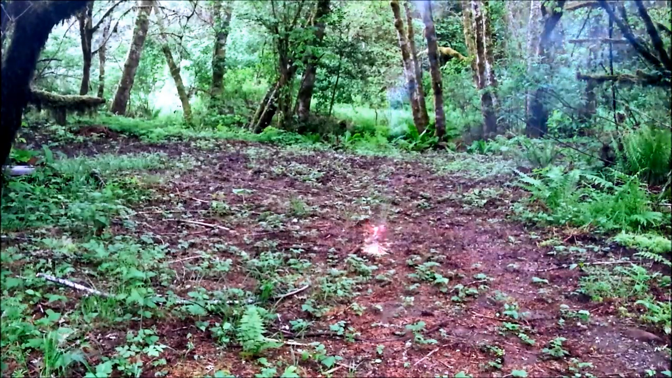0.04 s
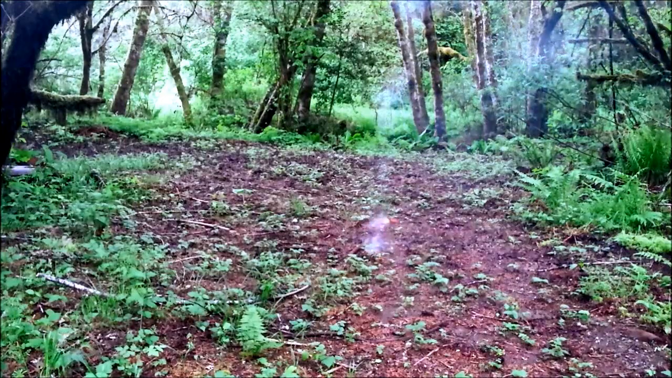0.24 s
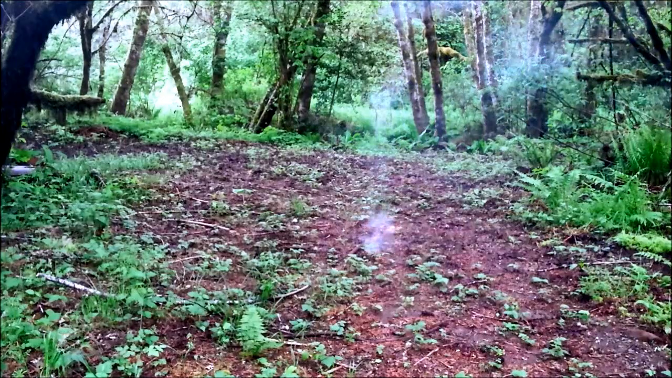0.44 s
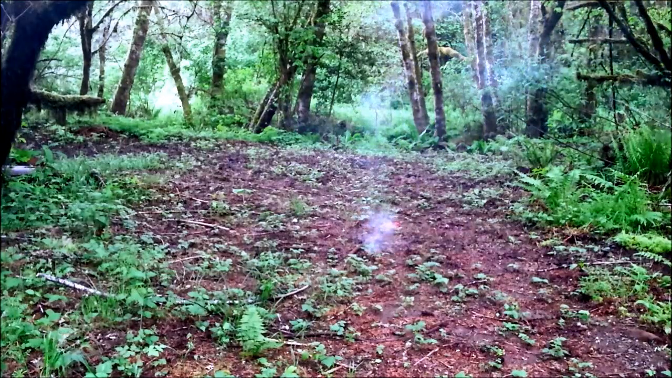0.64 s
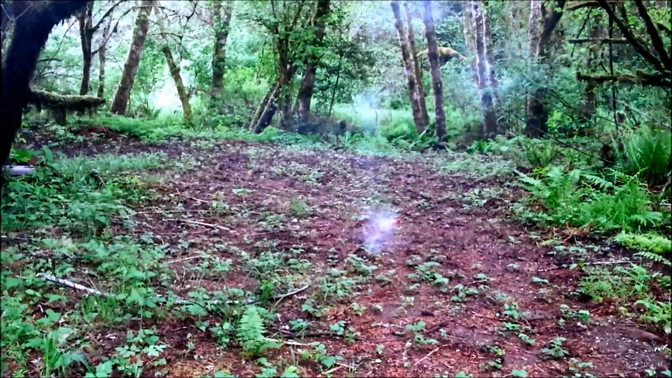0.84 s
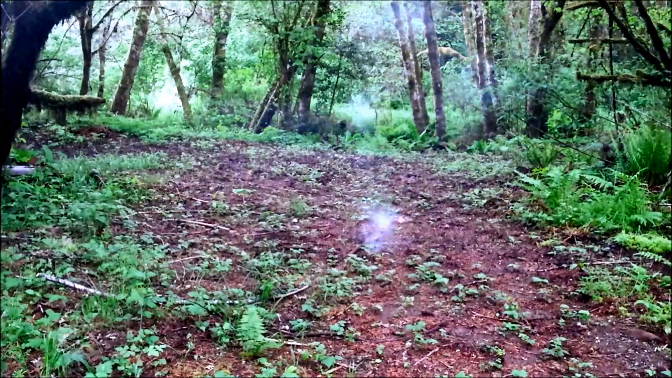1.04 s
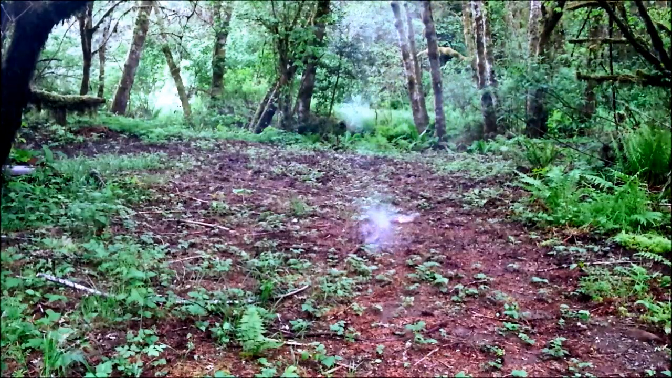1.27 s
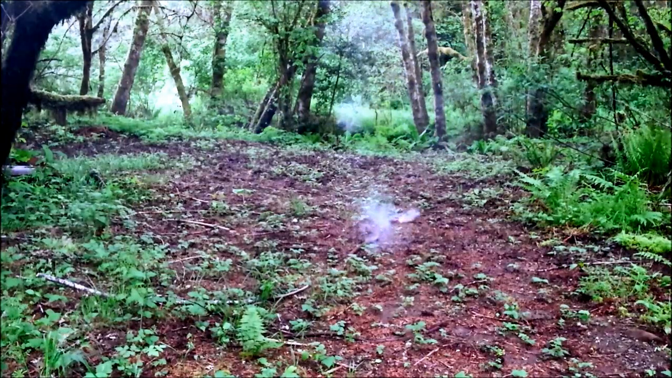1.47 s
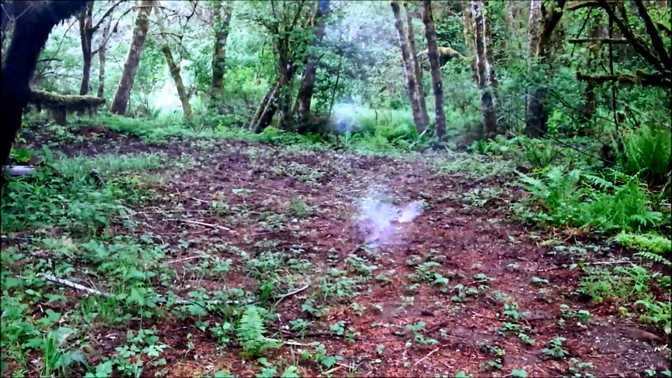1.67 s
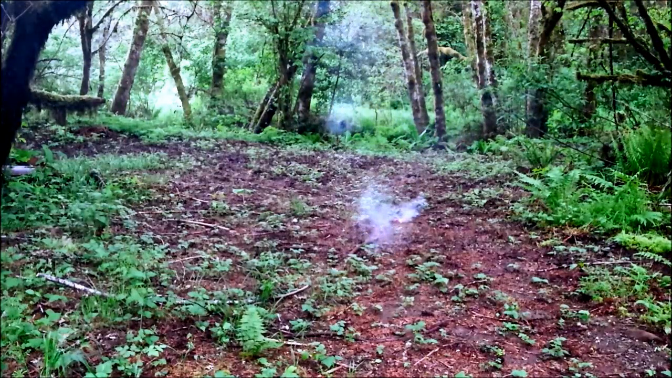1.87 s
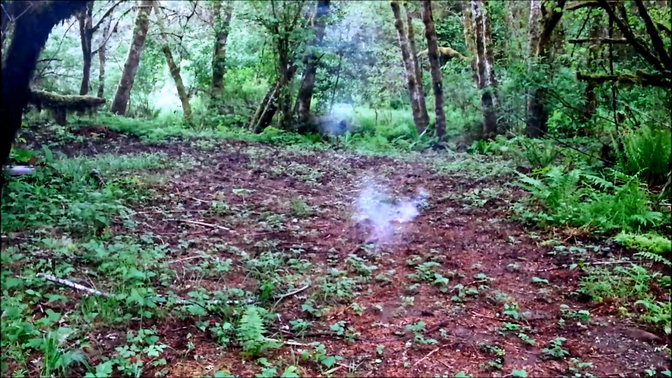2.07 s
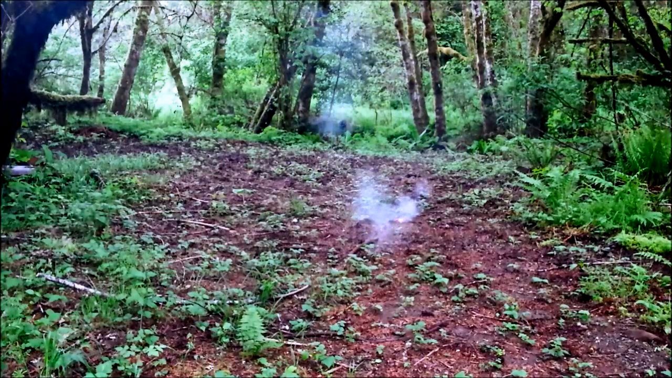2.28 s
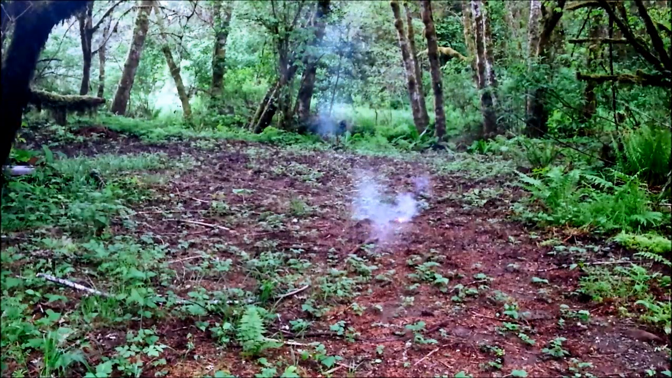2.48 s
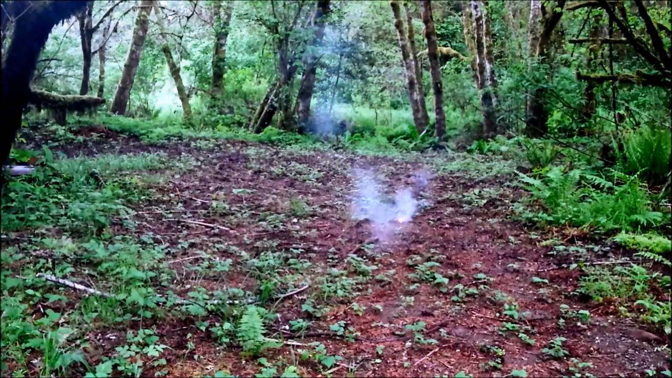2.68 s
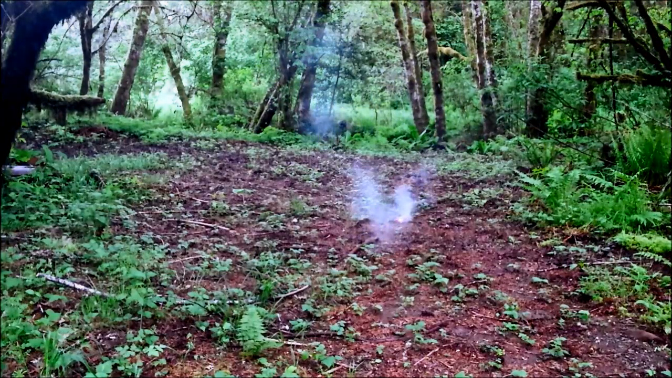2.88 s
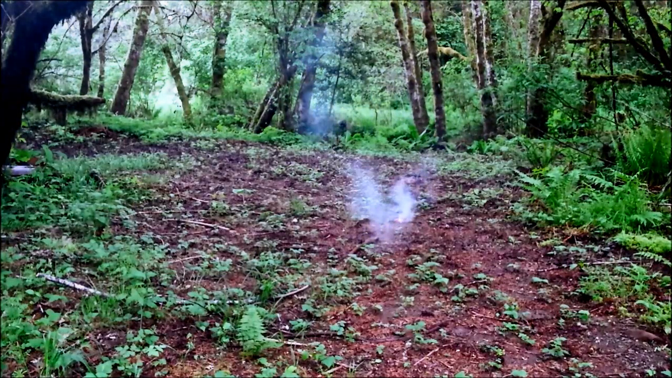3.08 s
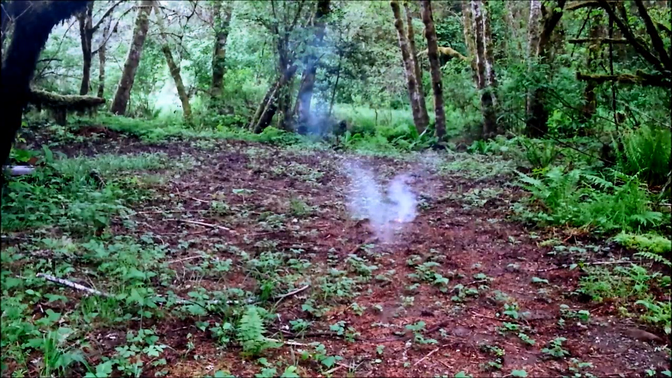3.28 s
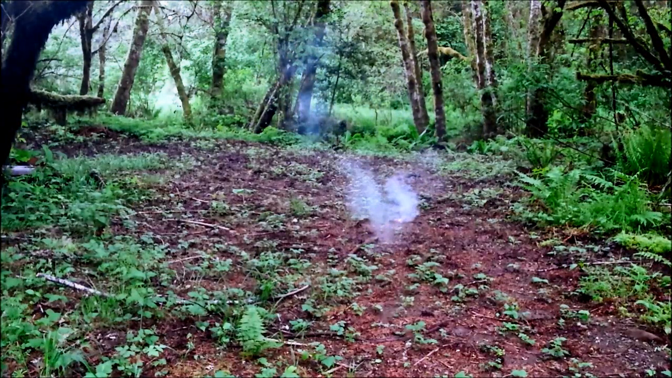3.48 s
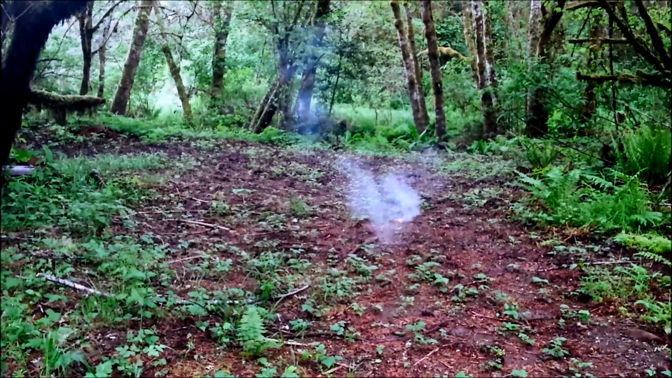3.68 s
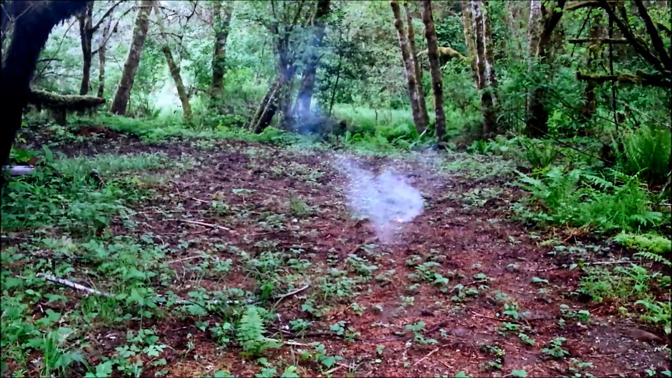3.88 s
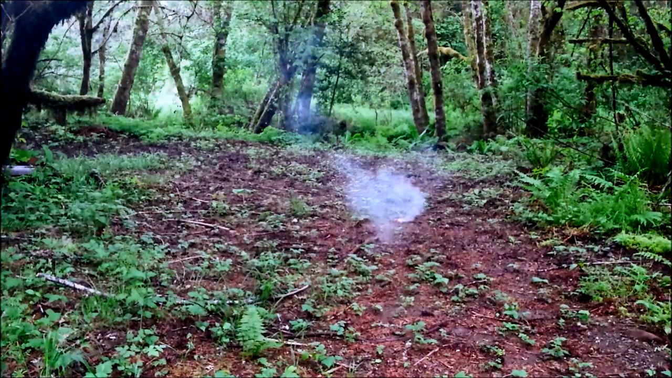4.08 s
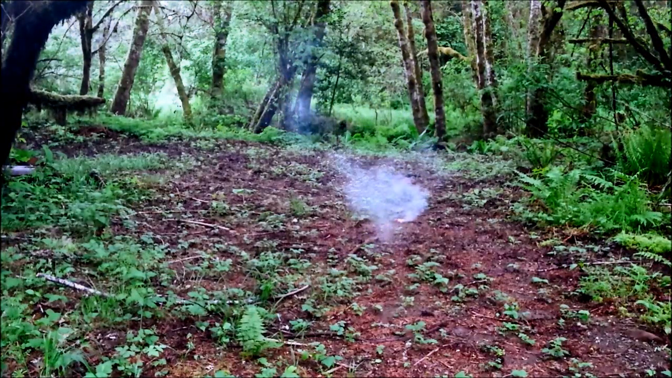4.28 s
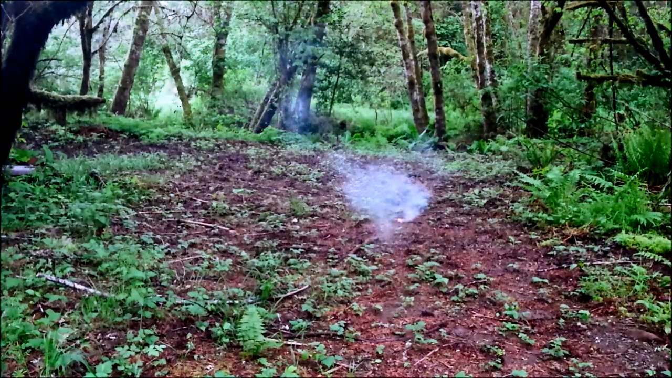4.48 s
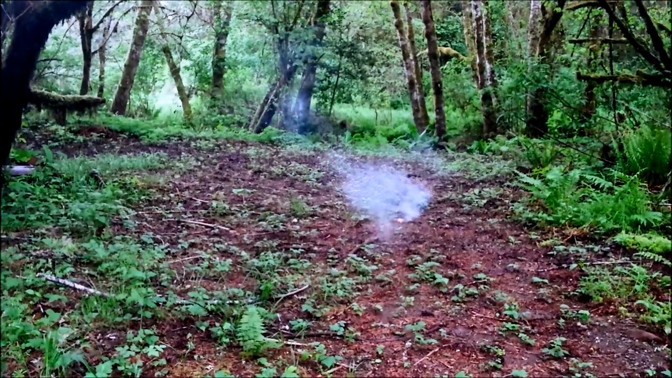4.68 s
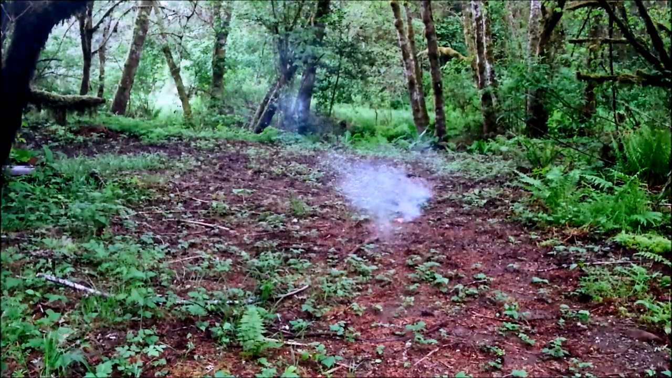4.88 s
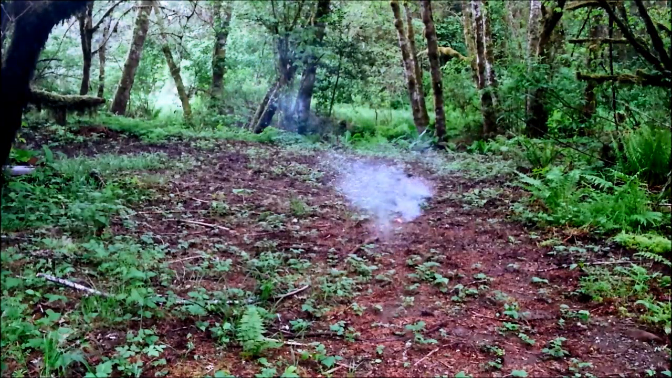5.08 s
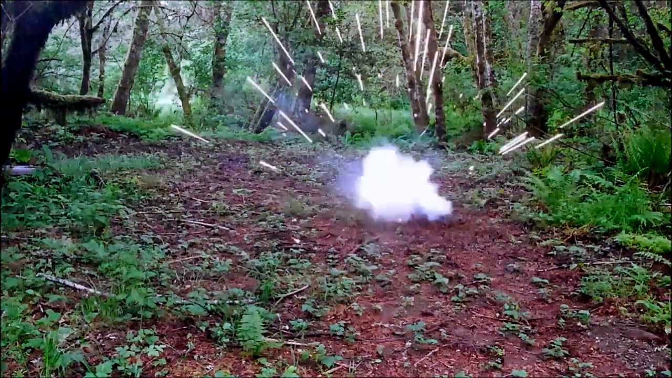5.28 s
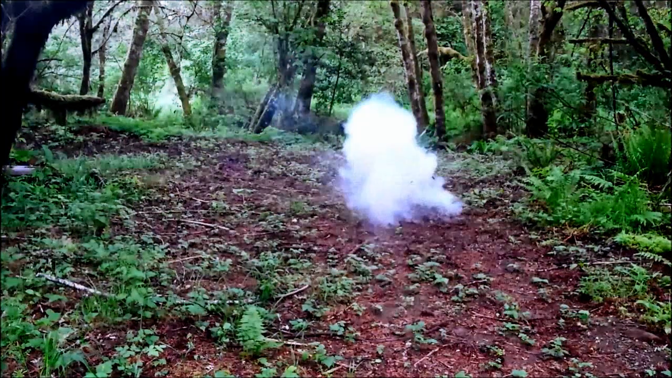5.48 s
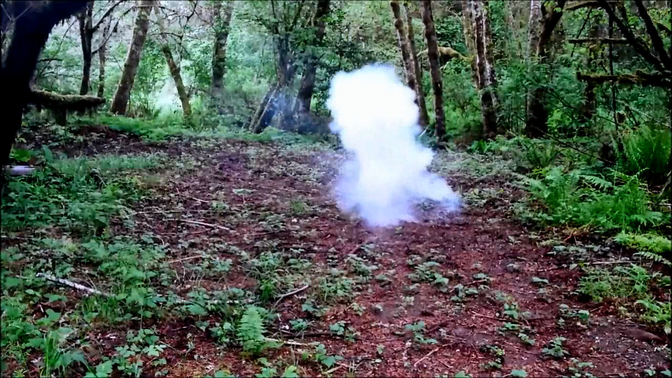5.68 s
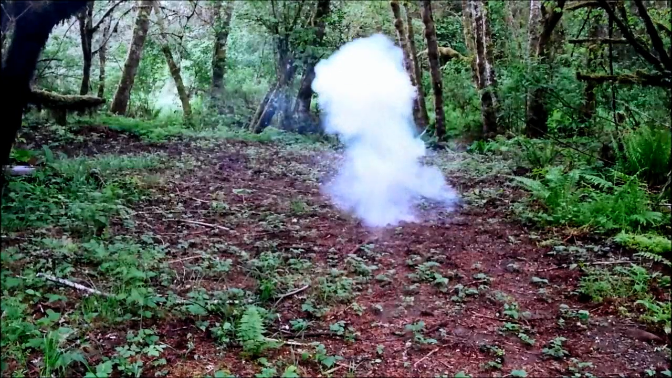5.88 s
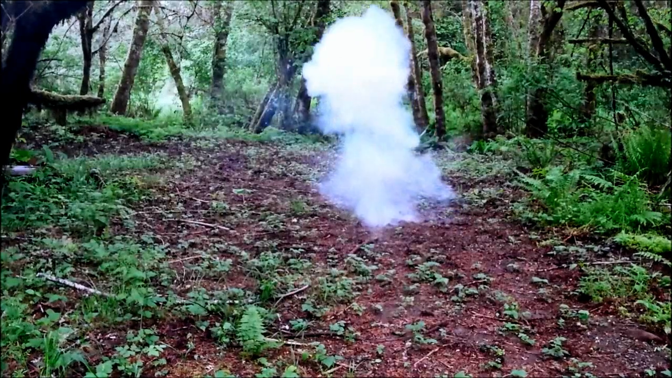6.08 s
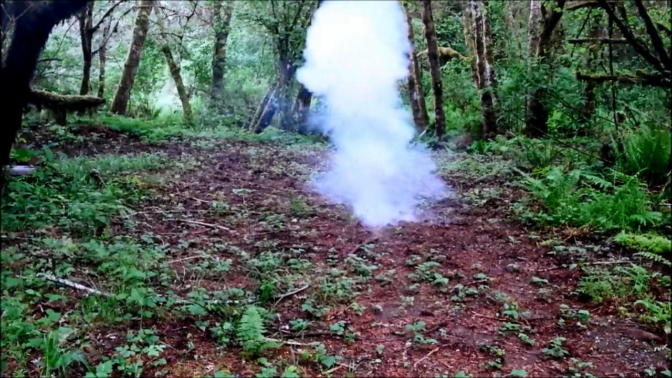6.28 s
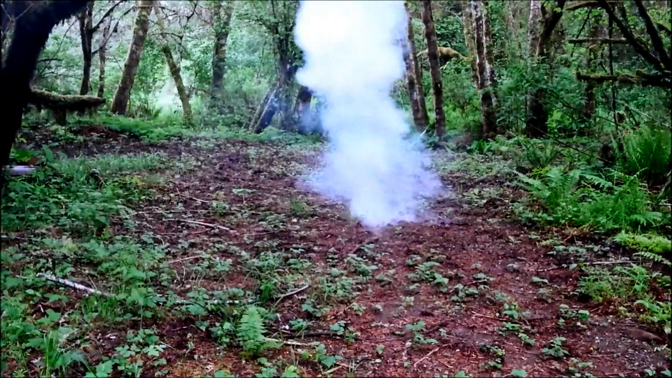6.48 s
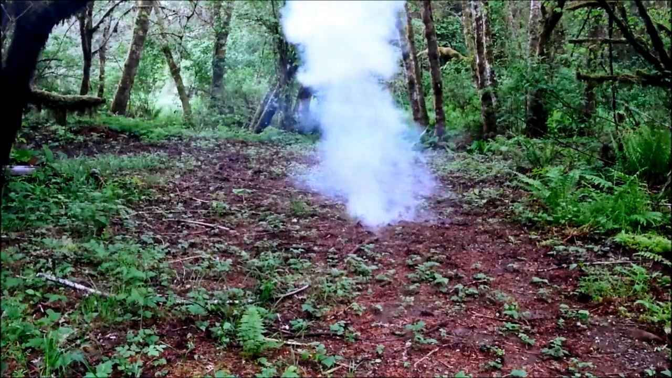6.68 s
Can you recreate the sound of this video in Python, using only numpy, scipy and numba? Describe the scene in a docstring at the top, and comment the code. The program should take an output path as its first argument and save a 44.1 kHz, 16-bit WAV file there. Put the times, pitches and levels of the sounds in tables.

```python
"""Firecracker in a wet wood

A firecracker (N-shaped pressure wave) lies on damp woodland ground; two microphones a hand apart
listen from some metres off. Wet leaves hiss (shaped noise) and drip (ringing clicks); something shifts
in the litter to the left (noise swells, hollow knocks). The blast overloads the recorder, whose gain
drops and creeps back while trees and far slopes send the bang home (fading, patchy noise)."""
import sys
import numpy as np
from scipy import signal
from scipy.fft import rfft, irfft, next_fast_len
from scipy.io import wavfile
from scipy.ndimage import uniform_filter1d
from numba import njit

SR = 44100
rng = np.random.default_rng(int(sys.argv[2]) if len(sys.argv) > 2 else 0)


def inscribe(sig):
    """Save sig as 16-bit PCM at rate SR to the path in sys.argv[1].

    A 1-D sig is mono; a 2-D sig holds one channel per row.
    Samples are clipped to [-1, 1] before scaling.
    """
    pcm = np.round(np.clip(np.atleast_2d(sig).T, -1, 1) * 32767)
    wavfile.write(sys.argv[1], SR, pcm.astype(np.int16))


def convert_level_to_amplitude(level_db):
    """Map a level in decibels to its linear amplitude factor."""
    exponent = np.asarray(level_db, float) / 20
    return 10 ** exponent


N = 297234
BLAST_S = 5.2271


def on_log(hz, table, col=1):
    """Read a column of a table on a log-frequency axis."""
    table = np.array(table)
    return np.interp(np.log(np.maximum(hz, 1)), np.log(table[:, 0]), table[:, col])


def band(x, hz, ratio):
    """Band-pass round hz, width as a ratio either side."""
    edges_hz = [hz / ratio, min(hz * ratio, 0.45 * SR)]
    return signal.sosfilt(signal.butter(2, edges_hz, "band", fs=SR, output="sos"), x)


def low(x, hz):
    """Low-pass, scaled to rms 1."""
    y = signal.sosfilt(signal.butter(2, hz, fs=SR, output="sos"), x)
    return y / y.std()


def aim(x, side):
    """A plane wave from one side (-1 left to 1 right) reaches the nearer port first."""
    port_gap_s = 18 / 44100
    pad = next_fast_len(len(x))
    hz = np.fft.rfftfreq(pad, 1 / SR)
    turn = np.exp(-1j * np.pi * hz * side * port_gap_s * np.array([[1], [-1]]))
    return irfft(rfft(x, pad) * turn, pad)[:, :len(x)]


def walk(rate_hz, size):
    """Random levels held 1 / rate_hz and slewed twice; spread near 1."""
    hold = int(SR / rate_hz)
    steps = np.repeat(rng.standard_normal(size // hold + 1), hold)
    slewed = uniform_filter1d(uniform_filter1d(steps, hold), hold)
    return 1.77 * slewed[:size]


def add(out, at_s, x, peak_db):
    """Mix a short sound in at a time and peak level."""
    i = int(at_s * SR)
    scaled = x * convert_level_to_amplitude(peak_db) / np.abs(x).max()
    out[i:i + len(x)] += scaled[:len(out) - i]


def faint(level_db, scatter_db, typical):
    """Chance rows (t/s, level/dB, length or pitch) scattered over the time before the blast."""
    per_s = 1.2
    count = int(per_s * BLAST_S)
    at_s, chance = rng.random(count) * BLAST_S, rng.standard_normal((count, 2))
    levels_db = level_db + scatter_db * chance[:, 0]
    return list(zip(at_s, levels_db, typical * np.exp(0.28 * chance[:, 1])))


# tree scatter: f/Hz, relative density at the start/dB, t60 before stretch/s
WOODS = [(30, -13, 1.3), (73, -1, 2.02), (171, 9, 1.5), (400, 6.5, 2.96), (900, 5.5, 2.5), (2240, 7, 1.91),
         (3950, 8, 1.555), (7000, 10, 1.06), (9500, 8.5, 0.86), (12000, 9.5, 0.28), (15900, 12.5, 0.26)]


def scatter(late_s, tilt_db_per_oct, stretch):
    """Noise from many trunks, fading band by band; air and leaves eat the treble first."""
    pad = len(late_s)
    hz = np.fft.rfftfreq(pad, 1 / SR)
    noise = rfft(rng.standard_normal(pad))
    centres_hz = 30 * 2 ** np.r_[0:8:.5, 8:9.3:.25]  # half octaves, finer on top
    field = 0
    for centre, row in zip(centres_hz, np.eye(len(centres_hz))):
        mask = np.sin(np.pi / 2 * on_log(hz, np.c_[centres_hz, row])) ** 2
        start_db = on_log(centre, WOODS) + tilt_db_per_oct * np.log2(centre / 1000)
        t60_s = stretch * on_log(centre, WOODS, col=2)
        patchy_db = (2.6 if centre < 1200 else 1.1) * walk(20, pad)  # trunks stand in clumps
        field = field + irfft(noise * mask, pad) * convert_level_to_amplitude(start_db - 60 * late_s / t60_s + patchy_db)
    return field


# returns: side (-1 left to 1 right), delay/s, rise/s, relative level/dB
RETURNS = [(0, 0, .0002, -2), (0, .012, .05, 1), (-.98, .006, .09, 3), (.98, .008, .09, 2.5),
           (-.45, .04, .06, 1.5), (.6, .07, .012, 8), (.55, .22, .03, -2), (.98, .35, .2, -11),
           (.4, .45, .2, -13), (.8, 1.15, .3, -27), (-.3, 1.2, .3, -29)]


def returns(t, end_s):
    """Later returns are duller; deep stands swell slowly and linger."""
    near_db_per_oct, far_db_per_oct, turn_s = 1.95, -4, 0.13
    out = np.zeros((2, len(t)))
    for side, delay_s, rise_s, db in RETURNS:
        late_s = np.maximum(t - delay_s, 0)
        tilt = far_db_per_oct + (near_db_per_oct - far_db_per_oct) * np.exp(-delay_s / turn_s)
        stretch = 0.33 + 0.75 * delay_s + 2.29 * np.sqrt(rise_s)
        swell = (1 - np.exp(-late_s / rise_s)) * (t < end_s)
        out += aim(scatter(late_s, tilt, stretch) * swell * convert_level_to_amplitude(db), side)
    return out


def shudder(t):
    """Housing shakes under the blast: decaying low noise, unlike at each port."""
    start_db, top_hz, t60_s = -3.5, 92, 1.1
    return low(rng.standard_normal((2, len(t))), top_hz) * convert_level_to_amplitude(start_db - 60 * t / t60_s)


def bang():
    """N-shaped pressure wave: a jump, a linear fall through zero, a jump back; then returns, shudder."""
    peak_db, half_s = 10, 0.001
    start = int(BLAST_S * SR)
    size = N - start
    t = np.arange(next_fast_len(size + SR // 10)) / SR
    wave = convert_level_to_amplitude(peak_db) * (1 - t / half_s) * (t < 2 * half_s)
    near = wave + returns(t, size / SR + 0.02) + shudder(t)
    out = np.zeros((2, N))
    out[:, start:] = near[:, :size]
    return out


# clearer rustles in the leaves: t/s, level/dB (peak before aiming), length/s
RUSTLES = [(0.319, -32, 0.018), (0.723, -25.5, 0.03), (0.827, -29, 0.023), (2.577, -30.5, 0.013),
           (2.617, -31.5, 0.01), (3.024, -28, 0.018), (3.264, -26, 0.0079), (3.624, -30, 0.022),
           (3.922, -27, 0.037), (3.997, -30, 0.016), (4.152, -22.5, 0.044), (4.937, -25, 0.051)]


def rustles():
    """Leaf friction: swelling noise; longer rustles reach lower."""
    out, t = np.zeros(N), np.arange(SR // 4) / SR
    for at_s, db, length_s in RUSTLES + faint(-34.5, 1.5, 0.018):
        shape = t / length_s * np.exp(-3 * t / length_s)
        add(out, at_s, band(shape * rng.standard_normal(len(t)), 5400, 2.1 + 41 * length_s), db)
    return out


# nearer drips snapping on leaves: t/s, level/dB (peak before aiming), f/Hz (centre)
DRIPS = [(.502, -20, 11000), (.662, -27, 7000), (.907, -23, 6500), (.96, -29.5, 1490), (2.1, -32, 10000),
         (2.176, -27, 8000), (3.2655, -26, 5600), (3.269, -21, 5600), (3.44, -22.5, 12000),
         (3.499, -31, 1310), (3.505, -27.5, 1290), (3.6242, -16.5, 7000), (4.177, -23, 6530),
         (4.289, -27, 6500), (4.6525, -4.5, 10300), (4.655, -17, 7900), (5.088, -25, 12400),
         (5.097, -25, 2500)]


def drips():
    """Drop on leaf: a click that rings a cycle or two."""
    out, t = np.zeros(N), np.arange(SR // 4) / SR
    for at_s, db, hz in DRIPS + faint(-28, 2.5, 7000):
        click = np.exp(-t * hz / 0.97) * np.cos(2 * np.pi * hz * t)
        add(out, at_s, band(click, hz, 1.7), db)
    return out


# dull knocks on soft ground and wood: t/s, level/dB (peak before aiming), f/Hz (ring), t60/s
KNOCKS = [(0.6657, -25.5, 604, 0.021), (0.678, -35, 400, 0.04), (0.961, -42, 900, 0.031),
          (1.12, -42.5, 275, 0.085), (1.404, -42, 372, 0.032), (1.883, -36.5, 486, 0.015),
          (3.925, -33, 444, 0.16), (4.146, -34, 375.6, 0.36), (4.169, -48, 161.6, 0.3),
          (4.947, -41.5, 494, 0.083)]


def knocks():
    """Low hollow ring plus noise; a longer knock rises more slowly and rings in a narrower band."""
    out, t = np.zeros(N), np.arange(SR // 4) / SR
    for at_s, db, hz, t60_s in KNOCKS:
        shape = (1 - np.exp(-t / (0.019 * t60_s))) * convert_level_to_amplitude(-60 * t / t60_s)
        noise = 8 * rng.standard_normal(len(t)) * np.tanh(t / 0.0054)
        ring = np.sin(2 * np.pi * hz * t) + noise
        add(out, at_s, band(shape * ring, hz, 1.26 + 0.036 / t60_s), db)
    return out


def litter():
    """Rustles, drips and knocks to the left: earlier and louder at the left port."""
    return aim(rustles() + drips() + knocks(), -0.605) * convert_level_to_amplitude([[1.5], [-2]])


def port_drop():
    """A drop on the right port: a pressure step on the membrane leaks away and swings back."""
    at_s, peak_db, left_db, leak_hz = 1.2740, -16.5, -41, 32  # left_db: relative to the right port
    leak = signal.butter(2, leak_hz, "high", fs=SR, output="sos")
    out = np.zeros(N)
    add(out, at_s, signal.sosfilt(leak, np.ones(SR // 10)), peak_db)
    return out * convert_level_to_amplitude([[left_db], [0]])


# hiss colour: f/Hz, relative density/dB
HISS = [(25, -31), (60, -7), (150, -8.5), (350, -3.5), (900, 0.5), (2000, 1), (5000, 2), (9000, -2),
        (16000, -12.5)]
# hiss swell: t/s, level/dB (rms)
HISS_SWELL = [(0, -42), (2, -43), (4, -42), (5.2, -41), (6.74, -34.5)]


def hiss():
    """Countless far drips all round blur to noise, most from the left; nearer ones patter out of it."""
    flicker_db, patter_db, left_lead_db, drips_per_s = -0.35, -8, 3, 300
    pad, out = next_fast_len(N), 0
    for side in -np.cos(np.linspace(0, 0.86 * np.pi, 8)):
        sizes = convert_level_to_amplitude(4 * np.minimum(rng.exponential(size=N), 5))
        clicks = (rng.random(N) < drips_per_s / SR) * sizes * 8
        patter = band(clicks, 9500, 2.13)
        noise = rng.standard_normal(N) * convert_level_to_amplitude(flicker_db * walk(12, N))
        lead_db = left_lead_db * np.exp(-(side + 1) / 0.1)
        out = out + convert_level_to_amplitude(lead_db) * aim(noise + convert_level_to_amplitude(patter_db) * patter, side)
    colour = convert_level_to_amplitude(on_log(np.fft.rfftfreq(pad, 1 / SR), HISS))
    out = irfft(rfft(out, pad) * colour, pad)[:, :N]
    swell_db = np.interp(np.arange(N) / SR, *np.transpose(HISS_SWELL))
    return out / out.std() * convert_level_to_amplitude(swell_db)


def scene():
    """All sources as they reach the two ports."""
    return bang() + litter() + port_drop() + hiss()


# recorder ports: f/Hz, left level/dB, right level/dB
PORTS = [(20.5, -11.5, -18), (104, 6.5, 4.5), (1080, 6.5, 5.5), (3000, 3, -1), (5040, 4.5, -0.5),
         (6390, 12.5, -7), (6620, 12, -11), (7180, 7.5, 4.5), (7470, 5, 1.5), (9360, -1, 2.5),
         (12000, -7, -3.5), (16130, -4.5, -6)]


def colour_ports(dry):
    """Each port filters the sound with a causal, minimum-phase response."""
    hz = np.fft.rfftfreq(1024, 1 / SR)
    wet = []
    for k in range(2):
        cepstrum = irfft(np.log(convert_level_to_amplitude(on_log(hz, PORTS, col=k + 1))))
        cepstrum[1:512] *= 2  # fold to a causal response
        cepstrum[513:] = 0
        response = irfft(np.exp(rfft(cepstrum)))
        wet.append(signal.fftconvolve(dry[k], response)[:N])
    return np.array(wet)


def capsule_noise():
    """Low self-noise, independent in each capsule."""
    rms_db, top_hz = -62.5, 310
    return convert_level_to_amplitude(rms_db) * low(rng.standard_normal((2, N)), top_hz)


@njit
def gain_control(loud, attack_s, top_db, depth_db, hold_s, rise_db_per_s):
    """Gain sinks while the output is over the top, waits, then climbs back at a steady dB rate."""
    gain, db, wait_s = np.empty(len(loud)), 0., 0.
    for i in range(len(loud)):
        if loud[i] * 10 ** ((db - top_db) / 20) > 1:
            db += (depth_db - db) / (attack_s * SR)
            wait_s = hold_s
        elif wait_s > 0:
            wait_s -= 1 / SR
        else:
            db = min(db + rise_db_per_s / SR, 0.)
        gain[i] = 10 ** (db / 20)
    return gain


def band_limit(x):
    """A steep low-pass at the top of the band."""
    return signal.sosfilt(signal.butter(12, 14870, fs=SR, output="sos"), x)


def record(dry):
    """Ports colour the sound, the gain falls too late to save the blast, and the converter clips."""
    wet = colour_ports(dry) + capsule_noise()
    power = uniform_filter1d(np.mean(wet ** 2, axis=0), size=1323, origin=661)  # past 30 ms
    loud = np.sqrt(power + 1e-12)
    attack_s, top_db, depth_db, hold_s, rise_db_per_s = 0.067, -14.5, -24.5, 0.84, 23
    wet = wet * gain_control(loud, attack_s, top_db, depth_db, hold_s, rise_db_per_s)
    wet = 1.01 * wet / (1 + np.abs(wet) ** 4) ** (1 / 4)  # preamp rounds off towards its rails
    mix = np.clip(wet, -1, 1)
    return band_limit(mix)


dry = scene()
out = record(dry)
inscribe(out)
```